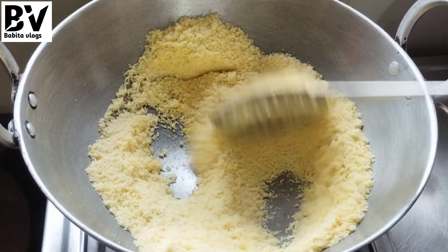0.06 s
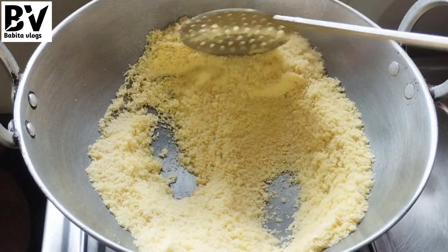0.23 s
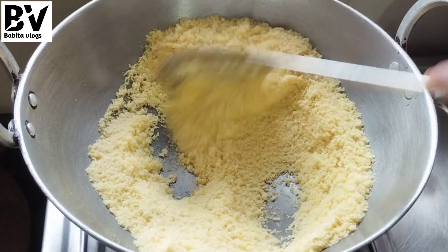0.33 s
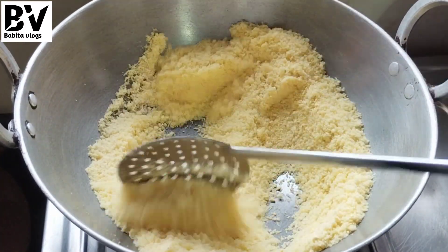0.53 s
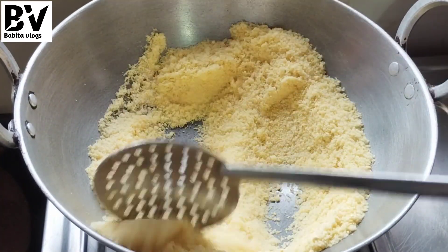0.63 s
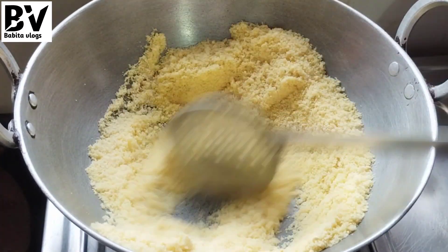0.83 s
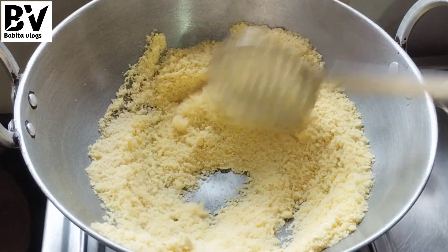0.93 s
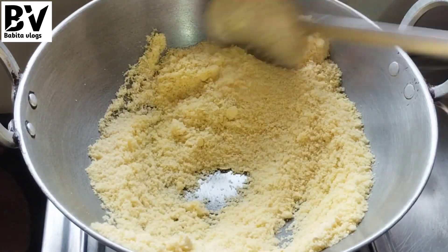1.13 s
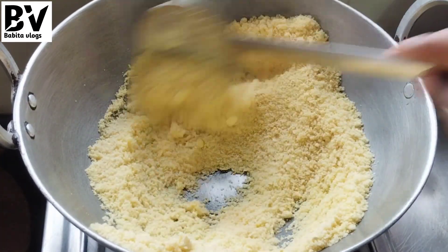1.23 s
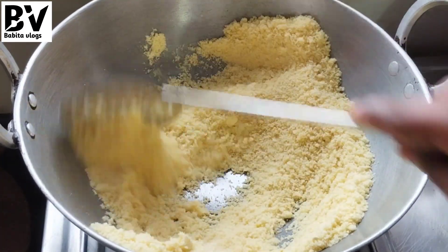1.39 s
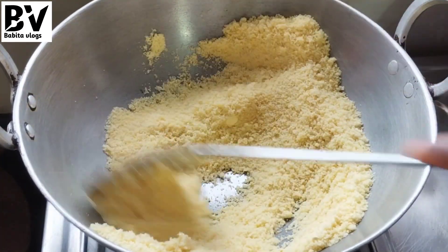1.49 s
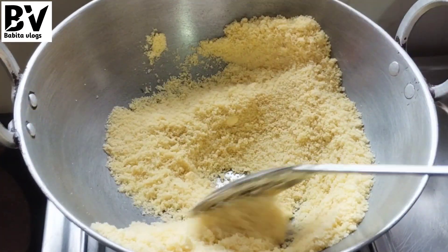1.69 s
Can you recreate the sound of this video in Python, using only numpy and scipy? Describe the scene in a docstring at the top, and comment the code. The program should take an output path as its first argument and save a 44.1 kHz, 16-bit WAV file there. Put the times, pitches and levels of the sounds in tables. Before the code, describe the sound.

Close by in a small kitchen, a steel ladle swishes through dry grains in a metal pan. A sharp ringing strike and skid come first, then muffled knocks, a lighter clink and a squeaky scrape, over a low room rumble.

```python
"""A perforated steel ladle stirs semolina roasting in a metal pan in a small kitchen.
Over a faint hiss and a low room rumble it swishes through the grains, strikes the pan (0.24 s) and
skids on; the loaded pan rings briefly and shudders. Cushioned knocks follow (0.56 s), then a lighter
strike, and the pan rocks once on the stove (0.78 s). The ladle lands on its edge (1.09 s), scrapes
across the pan with short squeals and pushes softly on through the heap."""
import sys
import numpy as np
from scipy import signal
from scipy.fft import rfft, irfft
from scipy.io import wavfile

SR = 44100
rng = np.random.default_rng(int(sys.argv[2]) if len(sys.argv) > 2 else 0)


def int16_out(signal):
    """Quantize to a 16-bit WAV file."""
    q = np.round(np.clip(np.atleast_2d(signal).T, -1, 1) * 32767)
    wavfile.write(sys.argv[1], SR, q.astype(np.int16))


N = 77175
T = np.arange(N) / SR
BODY_T60_S, LANDING_S = 0.0734, 1.0945

# ladle skids on after a strike: (time [s], rasp [dB], pan rumble [dB])
SKID_STROKE = [(0.243, -19, -24), (0.275, -30, -26), (0.292, -26, -34), (0.31, -20.5, -20.5),
               (0.333, -31, -41), (0.349, -19.5, -33.5), (0.366, -34, -28.5), (0.41, -43, -46.5),
               (0.46, -67, -78)]
# ladle edge drawn across the pan, twice: (time [s], rasp [dB], pan rumble [dB])
SCRAPE_STROKE = [(1.093, -49, -42), (1.096, -31.5, -33.5), (1.118, -28, -43), (1.149, -24, -41.5),
                 (1.223, -21.5, -35), (1.267, -25.5, -37.5), (1.284, -35, -33), (1.301, -57, -56),
                 (1.310, -25.5, -30), (1.330, -24.5, -34), (1.358, -37, -50), (1.39, -68, -51)]


def from_db(db):
    """Decibels to gain."""
    return 10 ** (np.asarray(db) / 20)


def rms_one(x):
    """Scale to unit rms."""
    return x / np.sqrt(np.mean(x ** 2) + 1e-20)


def unit_energy(x):
    """Scale a response to unit noise gain."""
    return x / np.sqrt(np.sum(x ** 2) + 1e-20)


def through(x, response):
    """Play x through an impulse response."""
    return signal.fftconvolve(x, response)[:N]


def colour(x, spectrum):
    """Give a steady signal a spectrum, 12 dB/octave down beyond its ends; rms 1."""
    hz, db = np.transpose(spectrum)
    bin_hz = np.maximum(np.arange(N // 2 + 1) * SR / N, 1)
    gain = from_db(np.interp(np.log(bin_hz), np.log(hz), db))
    skirts = np.minimum(bin_hz / hz[0], 1) ** 2 * np.minimum(hz[-1] / bin_hz, 1) ** 2
    return rms_one(irfft(rfft(x) * gain * skirts, N))


def dying(t60_s):
    """Exponential decay."""
    return np.exp(-np.log(1000) * T / t60_s)


def struck(modes):
    """Impulse response of decaying modes, alternating in sign."""
    return unit_energy(sum((-1) ** k * from_db(db) * np.sin(2 * np.pi * hz * T) * dying(t60_s)
                           for k, (hz, db, t60_s) in enumerate(modes)))


def crowd(spectrum, t60_s):
    """Response of many close modes that die together."""
    ring = rng.standard_normal(N) * dying(t60_s)
    for _ in range(3):  # even out mode strengths
        modes = rfft(ring)
        ring = irfft(modes / (np.abs(modes) + 1e-12), N) * (T < t60_s)
    return unit_energy(colour(ring, spectrum) * (T < 2 * t60_s))


def levels(stroke):
    """Gain curves of a stroke, silent outside it."""
    times_s, *columns_db = np.transpose(stroke)
    active = (T >= times_s[0]) * (T <= times_s[-1])
    return [from_db(np.interp(T, times_s, db)) * active for db in columns_db]


def clicks(times_s, levels_db):
    """One impulse per contact, with the energy of 10 ms at its level."""
    out = np.zeros(N)
    np.add.at(out, (np.asarray(times_s) * SR).astype(int), from_db(levels_db) * np.sqrt(SR / 100))
    return out


def background():
    """Steady faint hiss and low room rumble."""
    # noise floor: (frequency [Hz], density [dB])
    spectrum = [(20, 6.5), (40, -15.5), (60, 1.5), (100, -6), (150, -19.5), (600, -23.5), (3000, -27.5),
                (5500, -34), (8600, -22.5), (11500, -34.5), (16000, -38)]
    return from_db(-48) * colour(rng.standard_normal(N), spectrum)


def grains(rate_per_s=5000, spread_db=3):
    """Dense, uneven slips of grains under the ladle; rms 1."""
    sizes = from_db(spread_db * np.minimum(rng.exponential(1, N), 4)) * rng.choice([-1, 1], N)
    return rms_one(sizes * (rng.random(N) < rate_per_s / SR))


def pan_responses():
    """Ring of the loaded pan: (main modes, weak modes)."""
    # main low modes: (frequency [Hz], level [dB], t60 [s])
    main_modes = [(272, -5.5, 0.16), (399.7, 2.5, 0.1), (521, -4.5, 0.055), (610.8, -0.5, 0.18),
                  (667.5, 4, 0.046), (790.5, -10.5, 0.2), (1009, -7, 0.17), (1210, -8, 0.061),
                  (1604, -11.5, 0.13)]
    # crowd of weak modes: (frequency [Hz], density [dB])
    weak_spectrum = [(150, -11), (210, 1), (500, 0.5), (750, -3), (1300, -9), (1900, -16), (2800, -19.5),
                     (4500, -79)]
    return struck(main_modes), crowd(weak_spectrum, BODY_T60_S)


def rubbed_pan(drag, pan, main_db, weak_db):
    """Dragged grains excite the pan's main and weak modes."""
    main_ring, weak_ring = pan
    return through(drag * grains(), from_db(main_db) * main_ring + from_db(weak_db) * weak_ring)


def stirring(pan):
    """Loose grains slide over ladle and pan wall."""
    # ladle in the heap: (time [s], swish [dB], pan murmur [dB])
    stroke = [(0, -50, -46), (0.1, -60, -54), (0.23, -52.5, -53), (0.45, -50, -44.5), (0.6, -54.5, -52.5),
              (0.68, -47.5, -47.5), (0.73, -44, -53.5), (0.81, -43, -46), (0.89, -57, -54.5),
              (1.05, -52.5, -59.5), (1.40, -47, -46.5), (1.53, -48, -44), (1.61, -56.5, -48),
              (1.69, -56, -45.5), (1.75, -50, -59)]
    # sliding grains: (frequency [Hz], density [dB])
    spectrum = [(1500, -46), (3000, -15), (5500, -6.5), (8600, 2), (10500, -6), (16000, -21.5)]
    swish, murmur = levels(stroke)
    return swish * colour(grains(), spectrum) + rubbed_pan(murmur, pan, main_db=-11, weak_db=-3)


def steel_response():
    """Bright ring of ladle and pan in contact."""
    # contact resonances: (frequency [Hz], bandwidth [Hz], level [dB])
    resonances = [(5360, 37, 9.5), (5750, 62, 2.5), (6970, 70, 5), (7260, 120, 0.5), (7470, 85, -5),
                  (8400, 50, -7), (9360, 120, 3), (9700, 46, 5)]
    ring = np.zeros(N)
    for hz, width_hz, db in resonances:
        envelope = from_db(db) * width_hz * np.exp(-np.pi * width_hz * T)
        ring += rng.choice([-1, 1]) * envelope * np.sin(2 * np.pi * hz * T)
    return unit_energy(ring)


def strikes(pan_ring, steel):
    """Hard contacts ring the pan; each hits another spot, so has its own knock and clash."""
    # ladle strikes, bounces, catches: (time [s], pan ring [dB], knock [dB], clash [dB])
    contacts = [(0.2424, -15, -16.5, -12), (0.2491, -42, -21.5, -24), (0.2904, -24.5, -36, -32),
                (0.3046, -37, -29.5, -24.5), (0.3371, -33, -34, -32), (0.349, -35.5, -41, -26),
                (0.7394, -34, -36.5, -30.5), (0.7464, -44, -34.5, -29.5), (1.0928, -57, -36, -28.5)]
    # dull knock: (frequency [Hz], density [dB])
    knock_spectrum = [(150, -21), (230, -1.5), (680, -2.5), (1200, -2.5), (1900, -16), (3000, -27.5)]
    # high modes, metal on metal: (frequency [Hz], density [dB])
    clash_spectrum = [(1500, -14), (2900, -15), (3800, -2.5), (5400, 0.5), (7200, 5.5), (9400, 4.5),
                      (10600, -4.5), (12000, -5.5), (13500, -16), (16000, -22)]
    out = np.zeros(N)
    for time_s, ring_db, knock_db, clash_db in contacts:
        knock = from_db(ring_db) * pan_ring + from_db(knock_db) * crowd(knock_spectrum, BODY_T60_S)
        clash = from_db(clash_db) * (crowd(clash_spectrum, t60_s=0.11) + from_db(-6.5) * steel)
        out += through(clicks([time_s], [0]), knock + clash)
    return out


def rub(stroke, spectrum, pan, steel, rasp_db, steel_db, main_db, weak_db):
    """Grains ground between ladle and pan rasp and set both ringing."""
    bright, drag = levels(stroke)
    slips = grains()
    rasp = from_db(rasp_db) * bright * colour(slips, spectrum)
    ring = from_db(steel_db) * through(bright * slips, steel)
    return rasp + ring + rubbed_pan(drag, pan, main_db, weak_db)


def skid(pan, steel):
    """The ladle grinds on over the grains after the first strike."""
    # skid rasp: (frequency [Hz], density [dB])
    spectrum = [(1500, -39), (2900, -25), (3900, -8), (5200, -1.5), (7500, -6), (9200, 0), (10000, -38),
                (12000, -32), (16000, -34)]
    return rub(SKID_STROKE, spectrum, pan, steel, rasp_db=-1.5, steel_db=-11.5, main_db=-6, weak_db=-5)


def shudder(lag_s=0.038):
    """The pan shudders on the stove, following the drag of skid and scrape."""
    # deep rumble: (frequency [Hz], density [dB])
    spectrum = [(25, 8), (60, -7), (105, 10.5), (140, -21)]
    drag = levels(SKID_STROKE)[1] + levels(SCRAPE_STROKE)[1]
    return from_db(-16) * np.interp(T - lag_s, T, drag) * colour(rng.standard_normal(N), spectrum)


def soft_knocks(pan_ring, centre_hz=530, width_hz=77):
    """Contacts cushioned by semolina reach only the pan's middle modes."""
    # cushioned contacts: (time [s], level [dB])
    contacts = [(0.559, -35.5), (0.595, -41.5), (0.622, -40), (0.655, -42)]
    cushion = signal.iirpeak(centre_hz, centre_hz / width_hz, fs=SR)
    return through(clicks(*np.transpose(contacts)), unit_energy(signal.lfilter(*cushion, pan_ring)))


def ticks():
    """Light, dry ladle contacts that die at once."""
    # ticks: (time [s], level [dB], centre [Hz], bandwidth [Hz], t60 [s])
    contacts = [(0.562, -51.5, 2310, 700, 0.071), (1.6299, -50.5, 6000, 7040, 0.0062)]
    out = np.zeros(N)
    for time_s, db, hz, width_hz, t60_s in contacts:
        burst = rng.standard_normal(N) * dying(t60_s)
        tick = signal.lfilter(*signal.iirpeak(hz, hz / width_hz, fs=SR), burst)
        out += through(clicks([time_s], [db]), unit_energy(tick))
    return out


def rocking():
    """The pan rocks on the stove: a low tone swells and dies."""
    # wobble: (start [s], rise [s], frequency [Hz], level [dB], t60 [s])
    wobbles = [(0.775, 0.052, 59, -32.5, 0.29)]
    out = np.zeros(N)
    for start_s, rise_s, hz, db, t60_s in wobbles:
        age_s = T - start_s
        attack = np.clip(age_s / rise_s, 0, 1)
        decay = np.exp(-np.log(1000) * np.maximum(age_s - rise_s, 0) / t60_s)
        out += from_db(db) * attack * decay * np.sin(2 * np.pi * hz * age_s)
    return out


def landing(level_db=-26.5):
    """The ladle lands on its edge; its body rings with a hollow knock."""
    # low ladle modes: (frequency [Hz], level [dB], t60 [s])
    modes = [(264.7, -3.5, 0.14), (396.7, 0.5, 0.16), (703, -7.5, 0.2), (1136, -5, 0.084)]
    return through(clicks([LANDING_S], [level_db]), struck(modes))


def scrape(pan, steel):
    """The ladle's edge grinds across the pan."""
    # scrape rasp: (frequency [Hz], density [dB])
    spectrum = [(1500, -43), (2500, -21), (4200, -17), (5000, -12.5), (6200, -4.5), (7600, -1),
                (9600, -3.5), (10600, -14.5), (12000, -15), (13600, -29), (15000, -18.5), (16000, -40)]
    return rub(SCRAPE_STROKE, spectrum, pan, steel, rasp_db=0, steel_db=-10, main_db=-15, weak_db=-2)


def squeal(pitch_sag_per_s=0.11):
    """On bare metal the edge catches one resonance after another: short, rough tones."""
    # squeals: (peak time [s], Gaussian sigma [s], frequency [Hz], bandwidth [Hz], level [dB])
    resonances = [(1.135, 0.086, 1715, 30.6, -46), (1.153, 0.021, 5490, 40.5, -28),
                  (1.155, 0.016, 9260, 200, -26), (1.168, 0.0088, 7430, 300, -27),
                  (1.17, 0.058, 3785, 116, -40.5), (1.19, 0.053, 1194, 137, -38),
                  (1.187, 0.075, 4595, 119, -41.5), (1.21, 0.029, 9620, 58, -30.5),
                  (1.225, 0.023, 1640, 29.8, -44.5), (1.333, 0.0046, 7710, 100, -25.5)]
    out = np.zeros(N)
    for peak_s, sigma_s, hz, width_hz, db in resonances:
        swell = np.exp(-.5 * ((T - peak_s) / sigma_s) ** 2) * (T > LANDING_S)
        low_pass = signal.butter(2, width_hz / 2, fs=SR, output="sos")
        sway = signal.sosfilt(low_pass, rng.standard_normal((2, N)))
        phase = 2 * np.pi * hz * np.cumsum(1 - pitch_sag_per_s * (T - peak_s)) / SR
        tone = swell * (sway[0] * np.cos(phase) + sway[1] * np.sin(phase))
        out += from_db(db) * np.sqrt(np.sum(swell ** 2)) * unit_energy(tone)
    return out


def kitchen(x, t60_s=0.3, delay_s=0.011, tail_db=-11.5):
    """Add the diffuse tail of a small hard room."""
    tail = unit_energy(rng.standard_normal(N) * dying(t60_s) * (T > delay_s))
    return x + from_db(tail_db) * through(x, tail)


def scene():
    """Ladle and pan in the kitchen, over the background; mono."""
    steel, pan = steel_response(), pan_responses()
    pan_ring = pan[0]
    rubbing = skid(pan, steel) + scrape(pan, steel) + squeal()
    contacts = strikes(pan_ring, steel) + soft_knocks(pan_ring) + ticks() + landing()
    ladle = stirring(pan) + contacts + rubbing
    return (background() + kitchen(ladle) + shudder() + rocking())[None]


def record(dry, cutoff_hz=16100):
    """Clip at full scale, then low-pass steeply."""
    low_pass = signal.ellip(10, .1, 80, cutoff_hz, fs=SR, output="sos")
    return signal.sosfilt(low_pass, np.clip(dry, -1, 1))


dry = scene()
out = record(dry)
int16_out(out)
```